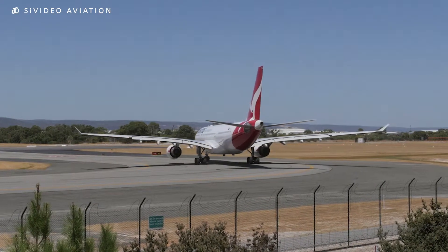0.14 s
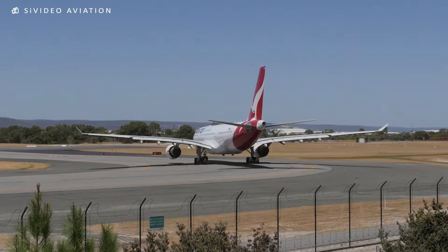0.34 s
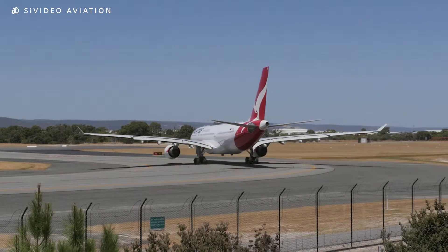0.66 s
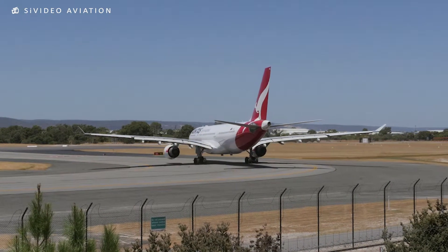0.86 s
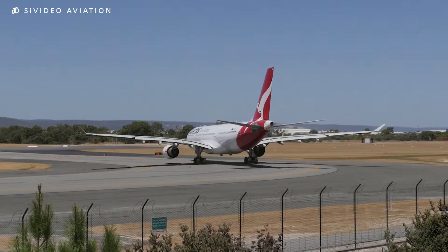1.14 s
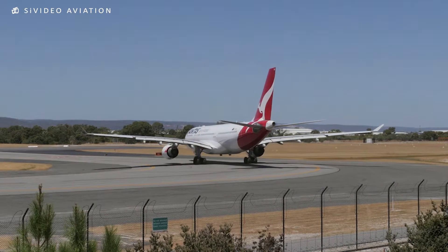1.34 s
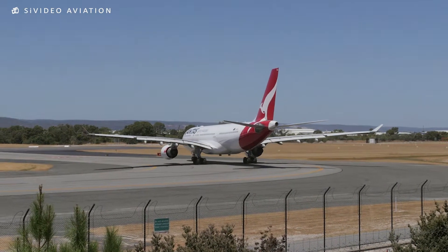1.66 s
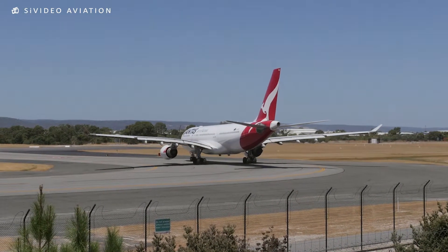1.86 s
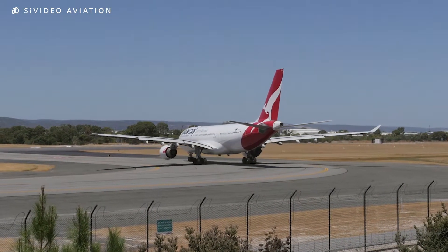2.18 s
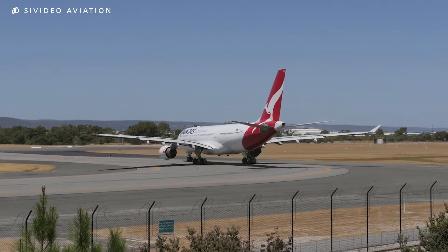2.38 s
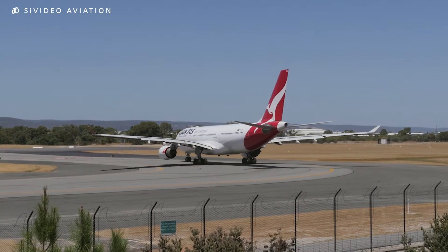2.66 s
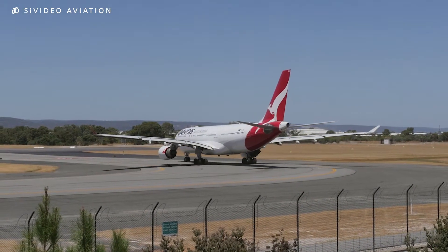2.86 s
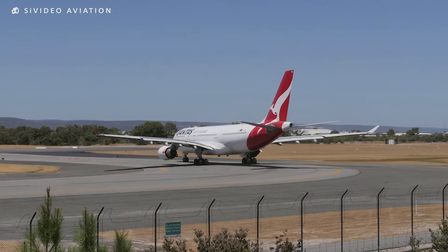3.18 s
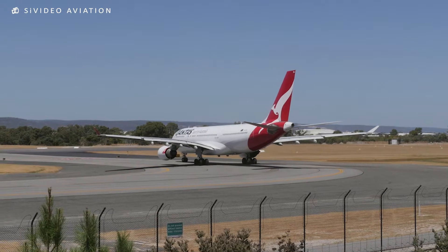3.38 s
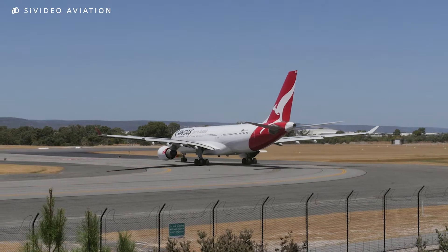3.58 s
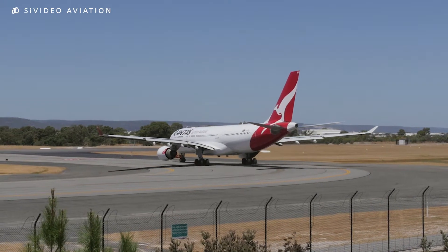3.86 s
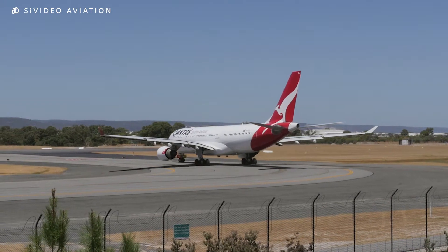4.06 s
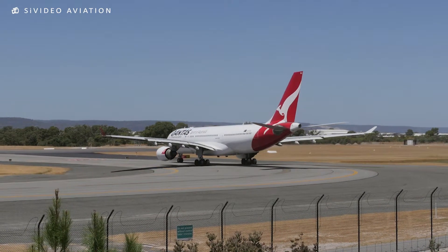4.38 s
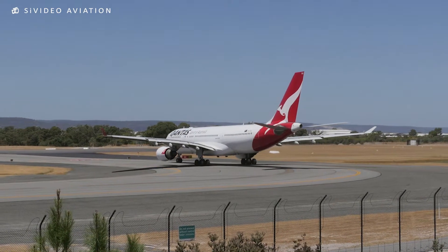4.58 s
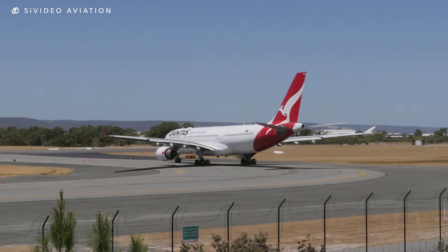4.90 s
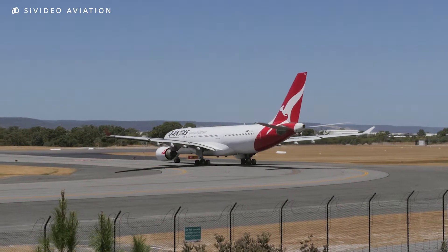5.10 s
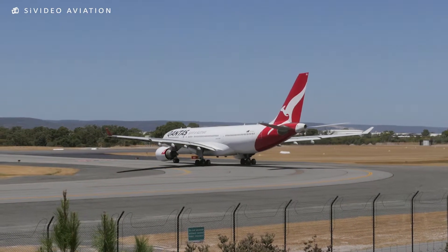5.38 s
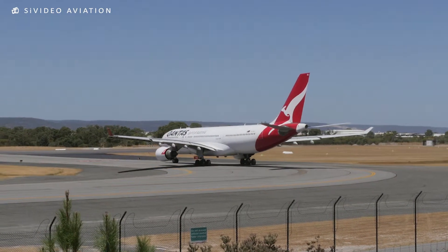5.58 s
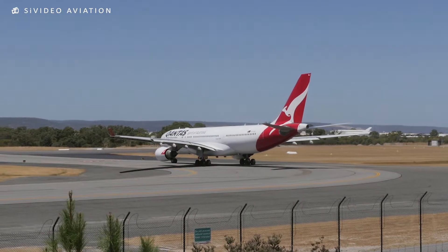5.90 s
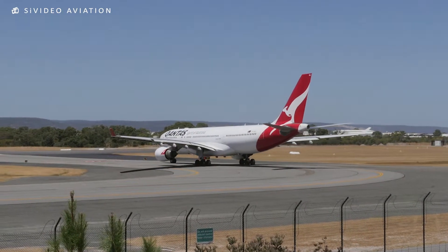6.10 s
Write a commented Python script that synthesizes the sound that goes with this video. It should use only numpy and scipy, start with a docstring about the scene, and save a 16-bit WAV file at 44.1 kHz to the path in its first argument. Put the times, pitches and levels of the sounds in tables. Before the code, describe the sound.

A large twin-engined airliner turns slowly at low power, heard from far across open grass by a mono camera microphone with a faint, even hiss. From 0 s two strong, pure low hums near 340 hertz, about nine hertz apart, beat in a quick throb, clearest around 0.5 to 1 s. Beneath them lie deep rumble, growl and soft mid roar; above, a gentle airy rush and thin sizzle. Fuzzy turbine whines, the highest near 4 kilohertz, waver in pitch and flicker. From 1.2 to 3 s the hums fade and return irregularly through moving air, and the sound thins a little. From 3.5 s the lower hum grows dominant and the throbbing weakens. Between 4.1 and 4.6 s a hollow whoosh around 1.1 kilohertz steps up and stays. The drone, rumble and whines continue fuller and slightly louder to the cut at about 6 s.

```python
"""A twin-engined airliner turns at low power, far across the grass. From the start each engine hums one strong low
tone, a sine; the two lie about nine hertz apart and throb against each other. Rumble, roar and rush of filtered
noise lie under fuzzy turbine whines, sines of straying pitch; moving air makes everything flutter. Past four
seconds the whoosh, two noise resonances, steps up and the lower hum wins. The camera hisses evenly throughout."""
import sys
import numpy as np
from scipy import signal
from scipy.fft import rfft, irfft, next_fast_len
from scipy.io import wavfile
from scipy.ndimage import uniform_filter1d, map_coordinates

SR = 44100
rng = np.random.default_rng(int(sys.argv[2]) if len(sys.argv) > 2 else 0)


def dump_mix(stems):
    """Bounce the given channels to the path in sys.argv[1] as a 16-bit WAV at rate SR."""
    frames = np.atleast_2d(stems).T  # one column per channel
    limited = np.clip(frames, -1, 1)  # hard clip at full scale
    pcm = np.round(limited * 32767).astype(np.int16)
    wavfile.write(sys.argv[1], SR, pcm)


N = 275625


def amp(db):
    """Gain of a level in dB."""
    return 10 ** (np.asarray(db) / 20)


def unit(x):
    """x scaled to rms 1."""
    return x / np.sqrt(np.mean(x ** 2) + 1e-20)


def curves(rows):
    """One automation curve, a value per sample, for each column after the time."""
    times, *columns = np.transpose(rows)
    sample_times = np.arange(N) / SR
    return [np.interp(sample_times, times, column) for column in columns]


def wobble(rate):
    """A smooth random curve through normal random knots, rate of them a second."""
    knots = rng.standard_normal(int(N * rate / SR) + 4)
    return map_coordinates(knots, [np.arange(N) * rate / SR])


def filtered(x, response):
    """x with each frequency scaled by response(hz), without phase shift."""
    size = next_fast_len(N + 8192)
    gains = response(np.fft.rfftfreq(size, 1 / SR))
    return irfft(rfft(x, size) * gains, size)[..., :N]


def spectrum(points):
    """An equaliser curve through (frequency, level) points on a log frequency axis."""
    f, db = np.transpose(points)
    return lambda hz: amp(np.interp(np.log(hz + 1), np.log(f), db))


def bands(modes):
    """Steep-sided resonance peaks: each resonance acts twice."""
    return lambda hz: sum(amp(db) / np.sqrt(width) / (1 + (2 * (hz - centre) / width) ** 2)
                          for centre, width, db in modes)


def noise(response, patchy_db):
    """Coloured noise of rms 1, with patches of random gain where eddies bend the path."""
    white = signal.stft(rng.standard_normal(N + 512), nperseg=512)[2]
    field = uniform_filter1d(rng.standard_normal(white.shape), 5, 0)  # patches five bins wide
    field = uniform_filter1d(field, 16, 1)  # and sixteen frames long
    patchy = signal.istft(white * amp(patchy_db * unit(field)), nperseg=512)[1][:N]
    return unit(filtered(patchy, response))


def hums():
    """Two engine tones; their sum swells each time the upper one gains a whole turn on the lower."""
    # drifting pitch of the lower hum: (time [s], frequency [Hz])
    pitch = [(0, 338.5), (.8, 338.6), (1.0, 339.7), (1.9, 339.3), (2.3, 340.3), (2.75, 338.1), (3.6, 340.1),
             (4.7, 340.5), (5.0, 339.6), (6.25, 340)]
    # turns the upper hum has gained on the lower: (time [s], throbs so far [turns])
    throb_count = [(0, -.05), (.47, 4.5), (.575, 5.5), (.895, 8.47), (1.03, 9.5), (1.23, 11.5), (1.5, 14.3),
                   (2.0, 18.75), (2.4, 22.4), (2.63, 24.55), (3.05, 28.29), (3.65, 33.9), (4.1, 37.95),
                   (4.8, 43.75), (5.45, 49.85), (5.8, 52.72), (6.25, 56.6)]
    # each hum's fades through moving air, ahead of its shimmer; the lower wins in the turn: (time [s], level [dB])
    lower_fades = [(0, -45.5), (.2, -40.5), (.5, -44), (.62, -41), (.92, -36.5), (1.2, -45.5), (1.33, -64),
                   (1.48, -40), (1.65, -44), (1.77, -47.5), (1.9, -43.5), (2.2, -49.5), (2.35, -50.5),
                   (2.55, -39.5), (2.9, -54), (3.01, -39), (3.35, -38.5), (3.5, -51), (3.7, -38),
                   (4.0, -33), (4.25, -37), (4.6, -39), (4.85, -32), (5.15, -35), (5.45, -33), (5.6, -38.5),
                   (6.15, -31), (6.25, -30)]
    upper_fades = [(0, -64), (.22, -59), (.45, -37.5), (.7, -35.5), (.95, -36), (1.08, -47.5), (1.23, -41),
                   (1.35, -51), (1.5, -45.5), (1.67, -55.5), (1.85, -40.5), (2.1, -44), (2.25, -62),
                   (2.46, -50), (2.95, -61), (3.45, -51.5), (4.1, -43.5), (4.3, -62), (4.55, -66),
                   (4.7, -49), (5.4, -52), (5.75, -43), (6.0, -53), (6.25, -55)]
    [low_hz] = curves(pitch)
    [throbs] = curves(throb_count)
    [low_db] = curves(lower_fades)
    [high_db] = curves(upper_fades)
    low_phase = 2 * np.pi * np.cumsum(low_hz) / SR
    high_phase = low_phase + 2 * np.pi * throbs
    low_gain = amp(low_db + 0.52 * wobble(30))  # each path shimmers on its own
    high_gain = amp(high_db + 0.8 * wobble(30))
    low = low_gain * np.sin(low_phase + 0.18 * wobble(40))  # phase jitter in radians
    high = high_gain * np.sin(high_phase + 0.15 * wobble(40))
    return np.sqrt(2) * (low + high)  # makes the levels rms levels


def exhaust():
    """Turbulent mixing behind the nozzles, from large slow eddies to small ones."""
    # jet noise: (time [s], rumble level [dB], growl level [dB], drone level [dB], roar level [dB])
    jet = [(0, -55, -45, -46.5, -50), (.7, -52, -46, -46, -50), (1.7, -53, -50, -49, -53),
           (2.5, -54, -51, -48, -52), (3.3, -50, -50.5, -48.5, -55), (4.2, -49, -51, -46.5, -52),
           (4.7, -48.5, -46, -51.5, -50.5), (5.3, -50, -49.5, -46, -51.5), (5.85, -47, -48, -47, -50),
           (6.25, -46.5, -45, -44, -53.5)]
    # colour of each layer: (frequency [Hz], relative level [dB per Hz])
    rumble_colour = [(15, -50), (28, -21.5), (45, -17), (65, -3), (90, 1.5), (115, -5), (150, -22.5),
                     (300, -76)]
    growl_colour = [(60, -51), (95, -12), (115, -0.5), (145, -5.5), (175, -1), (210, -7.5), (400, -57.5)]
    drone_colour = [(100, -51), (170, -27), (205, -1), (250, -2.5), (310, 0.5), (350, -1), (420, -12.5),
                    (800, -56.5)]
    roar_colour = [(200, -49.5), (320, -4), (400, 0), (500, -2.5), (650, -6), (800, -7.5), (900, -12),
                   (1040, -13), (1200, -15.5), (1400, -22), (3000, -59)]
    rumble_db, growl_db, drone_db, roar_db = curves(jet)
    rumble = amp(rumble_db) * noise(spectrum(rumble_colour), patchy_db=1.2)
    growl = amp(growl_db) * noise(spectrum(growl_colour), patchy_db=1.5)
    drone = amp(drone_db) * noise(spectrum(drone_colour), patchy_db=0.35)
    roar = amp(roar_db) * noise(spectrum(roar_colour), patchy_db=1.3)
    return rumble + growl + drone + roar


def flow():
    """Air through the fan ducts: a hollow resonant whoosh, a broad rush and a finer sizzle."""
    # fan flow ahead of trims and gusts, and the whoosh, which steps up when the turn uncovers a duct:
    # (time [s], flow level [dB], whoosh level [dB])
    air_levels = [(0, -58, -62), (.65, -58.5, -58.5), (1.35, -61.5, -62), (1.65, -59.5, -63.5),
                  (2.15, -57.5, -58), (2.55, -60, -59), (2.85, -59, -58), (3.5, -61.5, -58.5),
                  (4.1, -59, -58), (4.6, -57, -52), (5.0, -57.5, -51.5), (5.3, -56, -53.5),
                  (5.65, -57, -51.5), (6.25, -55, -51.5)]
    # duct resonances: (centre [Hz], width [Hz], relative level [dB])
    duct_modes = [(1025, 160, -0.5), (1186, 210, 0.5)]
    # colour of each broad layer: (frequency [Hz], relative level [dB per Hz])
    rush_colour = [(500, -52), (1000, -18), (1400, 3), (1600, 1), (2000, -0.5), (2300, -1), (3000, -18),
                   (5000, -57)]
    sizzle_colour = [(1200, -45), (2000, -13), (2500, 1.5), (2800, -3), (3050, -1), (3600, -3),
                     (4150, -4.5), (4600, -4), (5000, -10.5), (5300, -11.5), (6000, -18.5), (7000, -33),
                     (9000, -59)]
    rush_trim_db, sizzle_trim_db = -0.7, 0.32  # over the flow
    flow_db, whoosh_db = curves(air_levels)
    gust = wobble(4.71)  # shared by rush and sizzle
    whoosh = amp(whoosh_db) * noise(bands(duct_modes), patchy_db=1.2)
    rush_db = rush_trim_db + flow_db + 0.92 * gust
    rush = amp(rush_db) * noise(spectrum(rush_colour), patchy_db=0.64)
    sizzle_db = sizzle_trim_db + flow_db + 0.23 * gust
    sizzle = amp(sizzle_db) * noise(spectrum(sizzle_colour), patchy_db=0.6)
    return whoosh + rush + sizzle


def fuzzy(lines, flicker_db):
    """Sines smeared by restless air: the pitch strays quickly and the strength flickers."""
    total = 0
    for hz, stray_hz, db in lines:
        phase = 2 * np.pi * np.cumsum(hz + stray_hz * wobble(90)) / SR
        tone = amp(flicker_db * wobble(32)) * np.sin(phase)
        total = total + amp(db) * unit(tone)
    return total


def turbines():
    """Blade tones come a long way through restless air; the strongest whines wear a noisy halo."""
    # ahead of the slow swell: (time [s], lower engine's whine [dB], upper engine's whine [dB], fan tone [dB])
    whine_levels = [(0, -68, -59, -77), (.25, -79, -66.5, -68), (.55, -69, -61.5, -64),
                    (.85, -66.5, -70, -68.5), (1.2, -71, -73, -72), (1.38, -77, -63, -67),
                    (1.6, -62, -68, -73), (1.85, -68, -64, -67), (2.1, -69.5, -70.5, -74),
                    (2.4, -66.5, -64.5, -64), (2.75, -65, -69, -66.5), (3.0, -72, -72.5, -65),
                    (3.3, -69, -73, -71.5), (3.8, -72, -70, -67), (4.0, -66.5, -70, -70.5),
                    (4.35, -65.5, -70, -59.5), (4.65, -70, -69.5, -67), (4.9, -68, -77, -69),
                    (5.1, -62, -77, -61), (5.35, -63, -81, -63), (5.55, -63, -72, -61.5),
                    (5.9, -69, -72.5, -62), (6.12, -61, -70, -64), (6.25, -62.5, -77, -66)]
    # blade tones of the engine with the lower hum, of the other, and of the fans:
    # (frequency [Hz], pitch stray [Hz], relative level [dB])
    lower_tones = [(4136, 14, 0), (4661, 14, -10), (5184, 16, -16)]
    upper_tones = [(4091, 18, 0), (521, 9, 4), (1050, 10, 0), (1911, 8, -6), (4560, 30, -15),
                   (5146, 25, -16)]
    fan_tones = [(781, 8, 0), (1565, 7, -7), (2281, 11, -2), (2570, 16, -10)]
    # sound scattered around the main whines: (centre [Hz], width [Hz], relative level [dB])
    halo_band = [(4130, 200, 0)]
    fading_db = 0.5  # slow random swell of every whine
    lower_db, upper_db, fan_db = (db + fading_db * wobble(6.4) for db in curves(whine_levels))
    lower = amp(lower_db) * fuzzy(lower_tones, flicker_db=2.0)
    upper = amp(upper_db) * fuzzy(upper_tones, flicker_db=4.5)
    halo_gain = amp(-3) * np.hypot(amp(lower_db), amp(upper_db))  # follows both whines
    halo = halo_gain * noise(bands(halo_band), patchy_db=2.0)
    fan = amp(fan_db) * fuzzy(fan_tones, flicker_db=3.0)
    return lower + upper + halo + fan


def scene():
    """The whole aircraft, in mono."""
    return (hums() + exhaust() + flow() + turbines())[None]


def record(dry):
    """The camera adds an even hiss and keeps nothing above its band limit."""
    # colour of the hiss: (frequency [Hz], relative level [dB per Hz])
    hiss_colour = [(500, -8.5), (4000, -2.5), (8000, 0), (12000, -1.5), (16000, -1)]
    hiss_db, top_hz = -69, 15750  # hiss level ahead of the band limit, and that limit
    hiss = amp(hiss_db) * noise(spectrum(hiss_colour), patchy_db=0.0)
    return filtered(dry + hiss, lambda hz: hz < top_hz)


dry = scene()
out = record(dry)
dump_mix(out)
```